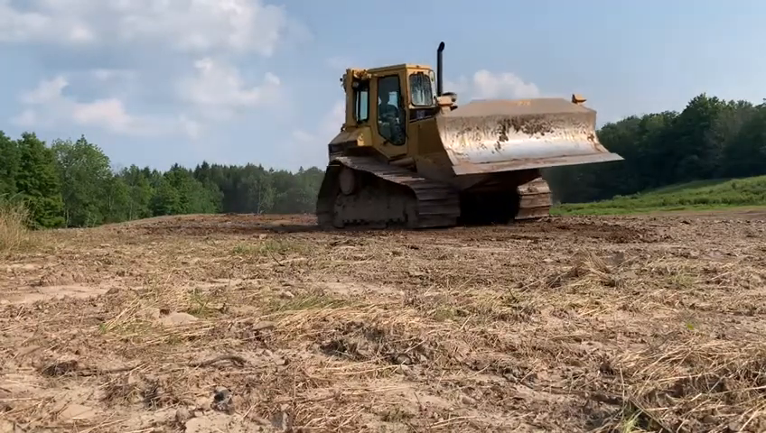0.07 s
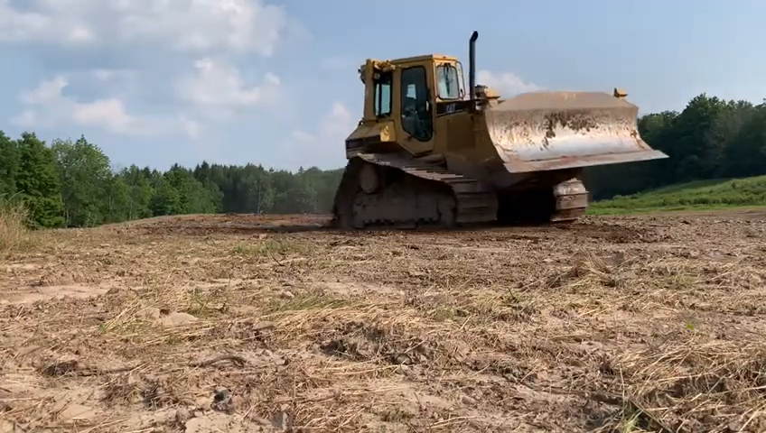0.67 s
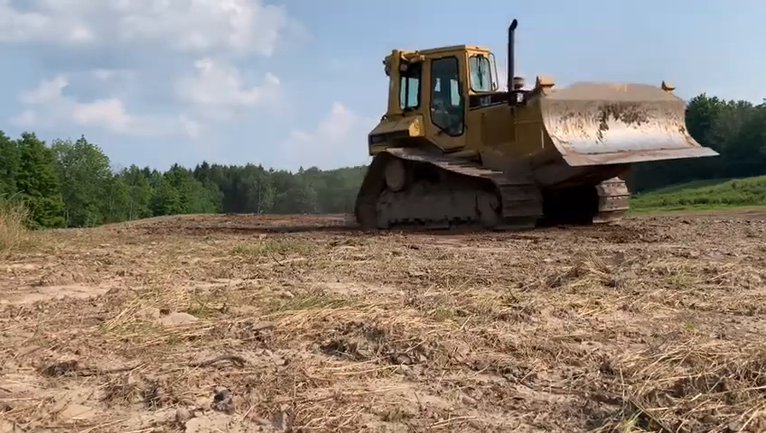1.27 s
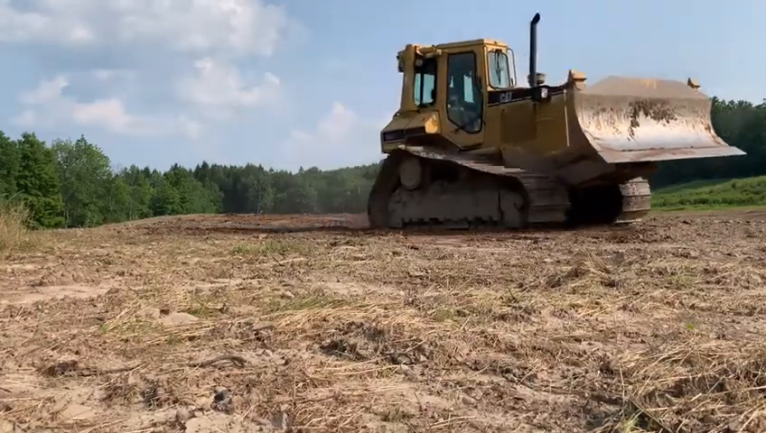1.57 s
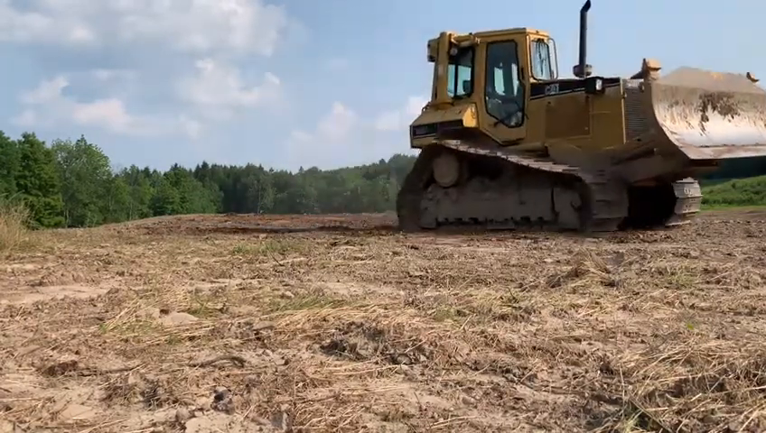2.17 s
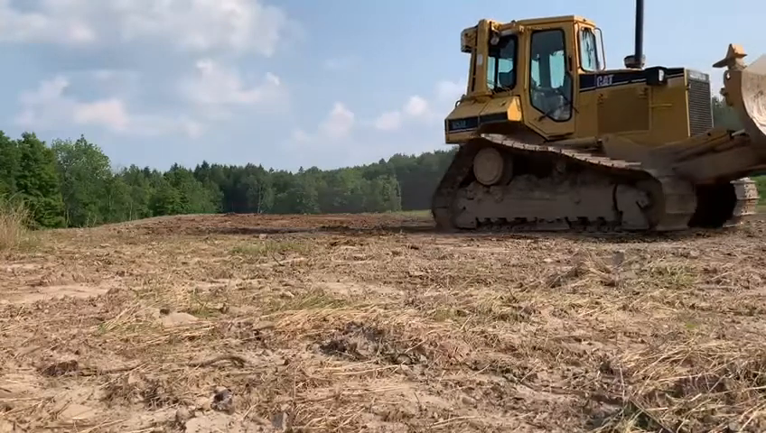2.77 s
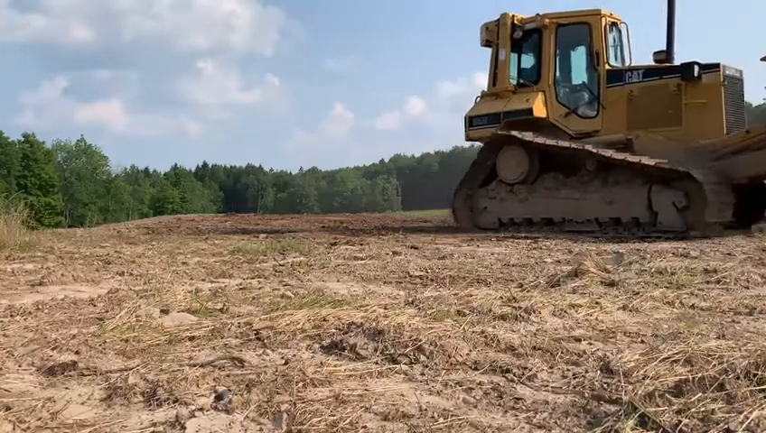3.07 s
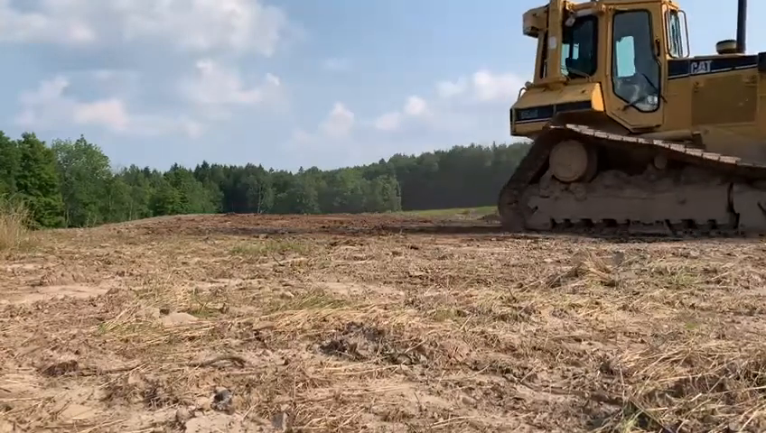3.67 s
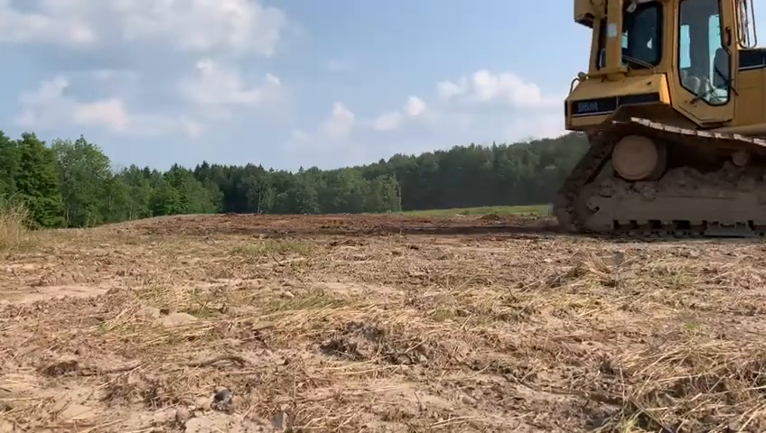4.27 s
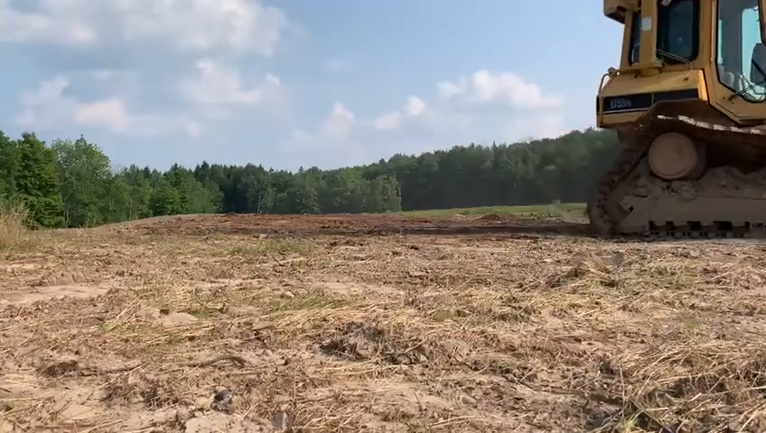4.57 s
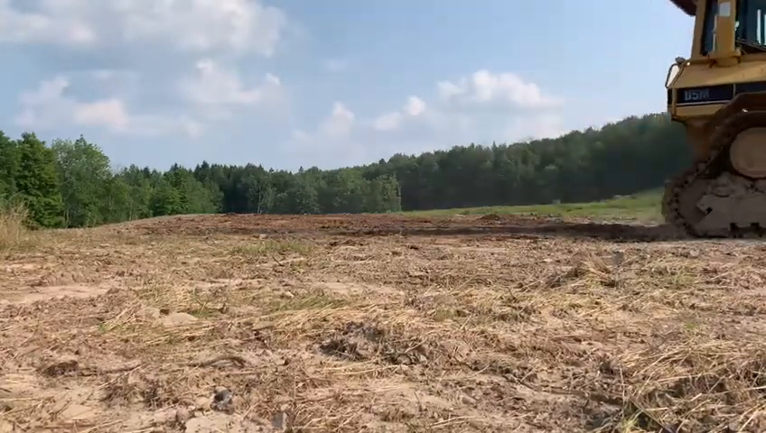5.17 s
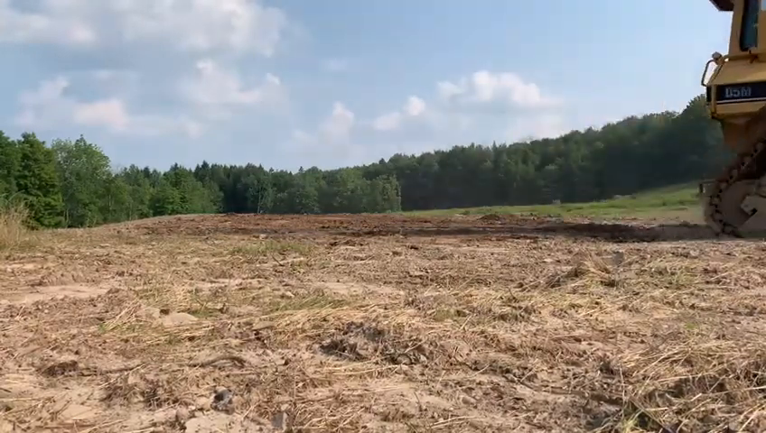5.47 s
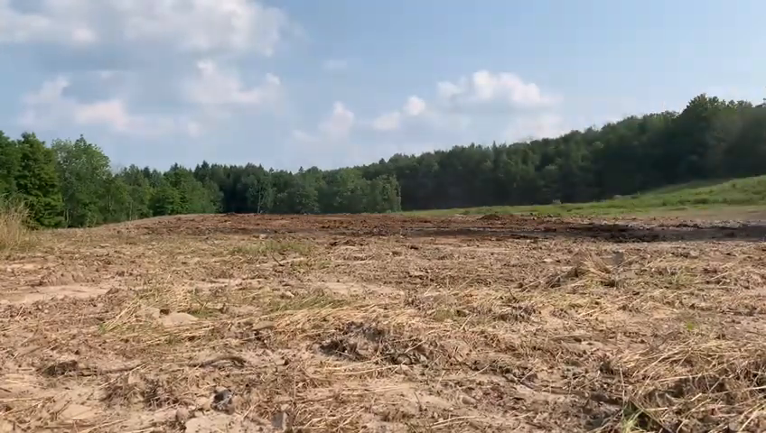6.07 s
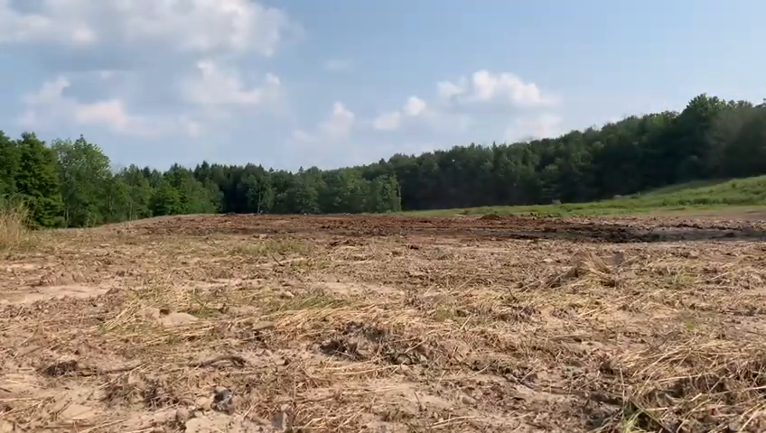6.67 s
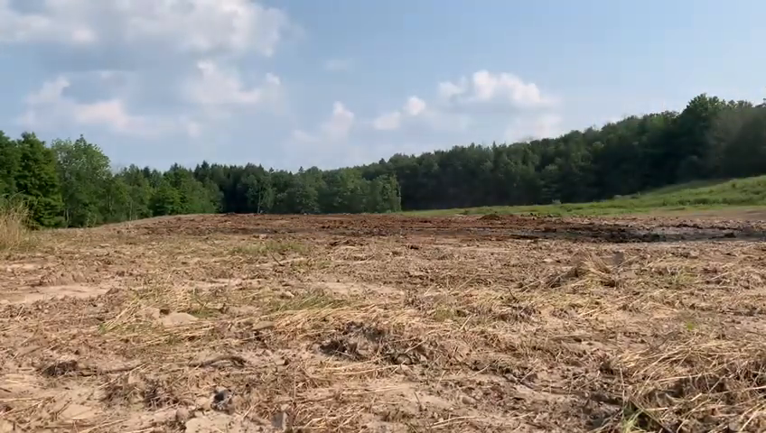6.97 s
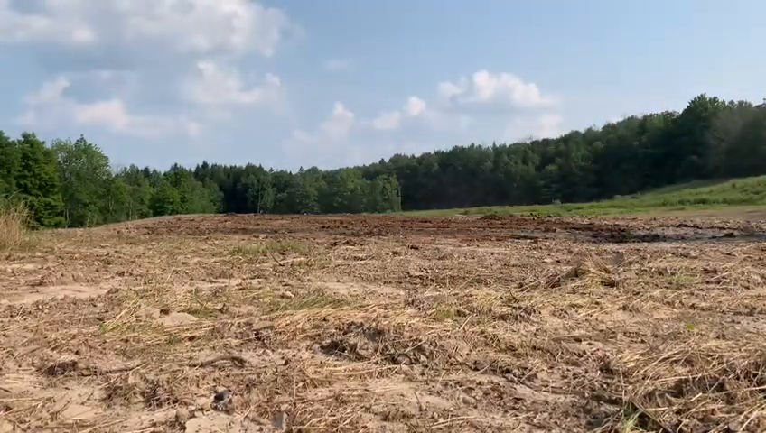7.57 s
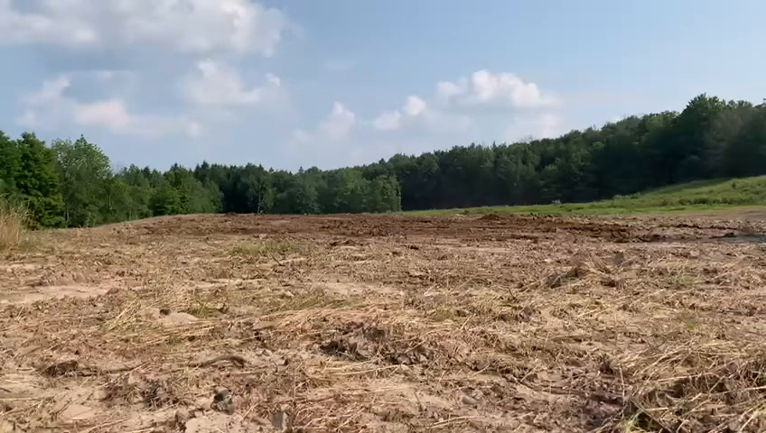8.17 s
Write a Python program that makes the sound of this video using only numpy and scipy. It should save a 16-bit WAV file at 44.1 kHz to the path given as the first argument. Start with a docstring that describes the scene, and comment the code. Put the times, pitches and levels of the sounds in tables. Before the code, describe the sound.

Steel bulldozer tracks clatter, scrape and squeak above a droning diesel engine as the machine passes close by in an open field.

```python
"""A diesel bulldozer crawls past on steel tracks and away to the right, heard on a phone in a field.
About eight times a second a track shoe (one plate of the track) slaps down and makes the frame ring.
Dry pins in the track chain scrape and squeak, rollers rumble over it, and crushed soil hisses.
Underneath, the engine's exhaust, fan and gears drone steadily. The sound changes as first the front,
then the side, then the back of the machine faces the phone."""
import sys
import numpy as np
from scipy import signal
from scipy.fft import rfft, irfft
from scipy.io import wavfile

SR = 44100
rng = np.random.default_rng(int(sys.argv[2]) if len(sys.argv) > 2 else 0)


def int16_out(signal):
    """Quantize to a 16-bit WAV file."""
    q = np.round(np.clip(np.atleast_2d(signal).T, -1, 1) * 32767)
    wavfile.write(sys.argv[1], SR, q.astype(np.int16))


N = 366912
T = np.arange(N) / SR
FREQS = np.arange(N // 2 + 1) * SR / N

# which side faces the phone: (time [s], bearing [quarter turns: 0 = front, 1 = side, 2 = back])
BEARING = [(0, -0.5), (1.9, -0.3044), (3.2, 0.59), (4.5, 1.1719), (5.7, 1.49), (7.3, 2.04), (8.32, 2)]
# how fast the cylinders fire: (time [s], firing rate [Hz])
ENGINE_SPEED = [(0, 106.4), (.7, 107.8), (2.1, 108.4), (3.5, 108.3), (5.6, 108.5), (6.4, 110.5),
                (7.6, 108.7), (8.32, 109)]
# how far the track has moved: (time [s], shoes laid so far [count])
TRACK_TRAVEL = [(.097, 0), (.728, 5), (2.018, 15), (3.915, 30), (5.905, 46), (6.385, 50), (7.179, 57),
                (7.641, 61), (8.251, 66)]


def undb(db):
    """Turn decibels into a number to multiply by."""
    return 10 ** (np.asarray(db) / 20)


def unit(x):
    """Scale a sound so that its average level (rms) is 1."""
    return x / np.sqrt(np.mean(x ** 2) + 1e-18)


def curves(table, at=T):
    """Read a table between its rows along straight lines: one curve for each column after the first."""
    positions, *columns = np.transpose(table)
    return [np.interp(at, positions, column) for column in columns]


def facing(values, at=T):
    """Blend three values (front, side, back) by which side of the dozer faces the phone."""
    return np.interp(curves(BEARING, at)[0], np.arange(3), values)


def turned_away():
    """How far the dozer has gone by: 0 until it is side-on, about 1 when seen from behind."""
    return np.maximum(curves(BEARING)[0] - 1, 0)


def colour(x, spectrum):
    """Shape a sound's lows and highs by (frequency [Hz], level [dB]) points; its level comes out as 1."""
    hz, db = np.transpose(spectrum)
    gain = undb(np.interp(np.log(FREQS + 1), np.log(hz), db))
    return unit(irfft(rfft(x) * gain, N))


def treble(x, above_hz, db):
    """Turn the high part of a sound up or down."""
    dull = signal.sosfiltfilt(signal.butter(2, above_hz, fs=SR, output="sos"), x)
    return dull + (x - dull) * undb(db)


def wander(rate):
    """A random curve, roughly within -1 to 1, that heads for a new value `rate` times a second."""
    points = rng.standard_normal(int(N / SR * 200) + 2)
    return 1.232 * np.interp(T * min(rate, 200), np.arange(len(points)), points)


def tone(hz, wobble_db, wobble_rate):
    """A pure tone whose loudness wavers."""
    cycles = np.cumsum(hz) / SR + rng.random()
    return np.sqrt(2) * np.sin(2 * np.pi * cycles) * undb(wobble_db * wander(wobble_rate))


def grit(rate, spread_db):
    """Tiny random impacts of unequal size, about `rate` of them a second."""
    hits = (rng.random(N) < rate / SR) * np.sign(rng.standard_normal(N))
    return unit(hits * undb(spread_db * np.minimum(rng.exponential(size=N), 4)))


def contacts(times, levels_db, lengths_s, rises_s, share):
    """Each contact is one hard blow, holding `share` of the energy, inside a brief rattle."""
    out = np.zeros(N)
    rattle = grit(4000, spread_db=1.89)
    signs = rng.choice([-1, 1], len(times))
    for s, db, length, rise, blow, sign in np.broadcast(times, levels_db, lengths_s, rises_s, share, signs):
        span = slice(max(int((s - .05) * SR), 0), int((s + .2) * SR))
        age = T[span] - s
        swell = np.exp(-.5 * np.where(age < 0, (age / rise) ** 2, abs(age / length) ** 1.097))
        force = rattle[span] * swell
        force *= np.sqrt((1 - blow) / np.sum(force ** 2))
        force[np.argmin(abs(age))] += sign * np.sqrt(blow)
        out[span] += force * undb(db) * np.sqrt((length + rise) * SR)
    return out


def resonate(force, modes, patchy_db):
    """Steel shakes at its own pitches (modes), each by an amount that varies with side and chain link."""
    out, power = 0, 0
    for k, (hz, width, *db) in enumerate(modes):
        gain = facing(undb(db)) * undb(patchy_db * wander(8))
        band = signal.lfilter(*signal.iirpeak(hz, hz / width, fs=SR), force)
        # a second, wider filter cuts more of what lies far from the pitch
        band = signal.lfilter(*signal.iirpeak(hz, hz / (4 * width), fs=SR), band)
        out = out + (-1) ** k * gain * band * np.sqrt(SR / (np.pi * width))
        power = power + gain ** 2
    return out / np.sqrt(power)


def ringing(times, levels_db, pitches_hz, ring_s):
    """Struck steel gives one clear note at each blow, which dies away by 60 dB in `ring_s` seconds."""
    rise_s = .0022
    out = np.zeros(N + SR)
    age = np.arange(SR // 4) / SR
    fade = -np.expm1(-age / rise_s) * np.exp(-np.log(1000) * age / ring_s)
    for s, db, hz, phase in zip(times, levels_db, pitches_hz, rng.random(len(times))):
        start = max(int(s * SR), 0)
        note = np.sqrt(2) * np.sin(2 * np.pi * (hz * age + phase))
        out[start:start + len(age)] += undb(db) * fade * note
    return out[:N]


def roller_squeal():
    """A dry roller sings faintly for a moment as the dozer comes closer."""
    peak_s, length_s, hz = 0.67, 0.02, 2338.5
    swell = undb(-43) * np.exp(-((T - peak_s) / length_s) ** 2)
    return swell * tone(hz * (1 + .002 * wander(40)), wobble_db=2.9, wobble_rate=20)


def whistle():
    """A thin, high whistle comes and goes, and sinks a little in pitch at its end."""
    # the whistle's path: (time [s], pitch [Hz], level [dB])
    whistle_path = [(.4, 9453, -63), (.75, 9453, -37), (1.1, 9453, -59), (2.4, 9450, -60), (2.9, 9450, -44),
                    (3.98, 9440, -56), (4.03, 9442, -43.5), (4.3, 9457, -37.5), (4.65, 9430, -44),
                    (5.1, 9410, -60)]
    hz, db = curves(whistle_path)
    return undb(db) * tone(hz * (1 + .0008 * wander(60)), wobble_db=2, wobble_rate=25)


def soil():
    """Earth crushed in the tracks hisses in quick, uneven spurts."""
    # strength of the hiss: (time [s], level [dB])
    hiss_levels = [(0, -28), (.7, -26.5), (1.5, -25), (2.1, -27), (3.1, -31), (4.2, -34.5), (6.0, -30.5),
                   (7, -33.5), (8.32, -37.5)]
    # tone colour of the hiss: (frequency [Hz], level [dB])
    hiss_spectrum = [(1500, 1.5), (2800, -6), (3400, 1), (4000, 1), (5000, 3), (5900, -0.5), (6500, 3.5),
                     (7300, -12), (8100, 2.5), (8800, 1), (10300, -2.5), (11500, -17)]
    hiss = colour(grit(9000, spread_db=2.31), hiss_spectrum)
    hiss = treble(hiss, above_hz=7000, db=facing((-0.03, 0.96, -1.5)))  # the body hides it from behind
    return hiss * undb(curves(hiss_levels)[0] - 2.0 + 1.27 * wander(70) + 1.37 * wander(9))


def gears():
    """The gears whine faintly, and more faintly still from behind."""
    # gear notes: (pitch [Hz], level [dB])
    gear_notes = [(1410, -45), (2493, -49)]
    whine = sum(undb(db) * tone(hz * (1 + 0.00349 * wander(40)), wobble_db=5.02, wobble_rate=9)
                for hz, db in gear_notes)
    return whine * undb(-7 * turned_away())


def fan(firing_hz):
    """The cooling fan's blades hum in step with the engine, loudest as the radiator goes by."""
    # strength of the hum: (time [s], level [dB])
    fan_levels = [(0, -23.5), (1.4, -20.5), (3.2, -16), (5.5, -18), (7.6, -20), (8.32, -24)]
    blade_hz = 1.471 * firing_hz
    hum = tone(blade_hz, wobble_db=0.48, wobble_rate=12)
    octave = undb(-20) * tone(2 * blade_hz, wobble_db=3.2, wobble_rate=5.5)
    return undb(curves(fan_levels)[0] - 0.2459) * (hum + octave)


def exhaust(firing_hz):
    """The cylinders fire so fast that their puffs blend into a low note with weaker notes around it."""
    # strength of the exhaust: (time [s], firing note [dB], its octave [dB])
    exhaust_levels = [(0, -26.5, -20), (.8, -20, -23), (2.7, -22.5, -22), (3.5, -21.5, -25.5),
                      (5.5, -21, -27), (6.6, -27, -46), (7.7, -25.5, -36), (8.32, -26.5, -39.5)]
    # weaker engine notes: (pitch [times the firing rate], level [dB])
    weak_notes = [(.5, -44.5), (1.667, -31), (2.333, -37.5), (2.5, -36.5), (3, -37)]
    note_db, octave_db = curves(exhaust_levels)
    note = undb(note_db + 0.56) * tone(firing_hz, wobble_db=1.0, wobble_rate=13)
    octave = undb(octave_db) * tone(2 * firing_hz, wobble_db=1.83, wobble_rate=13)
    weak = sum(undb(db) * tone(k * firing_hz, wobble_db=3.0, wobble_rate=5) for k, db in weak_notes)
    return note + octave + weak


def gas_roar():
    """Rushing engine gas makes a low roar that throbs with each firing."""
    # tone colour of the roar: (frequency [Hz], level [dB])
    roar_spectrum = [(15, -35), (35, -41.5), (60, -6), (85, -10.5), (115, -1.5), (150, -3), (200, -0.5),
                     (260, -2.5), (330, -5), (450, -10.5), (700, -21), (1500, -44.5)]
    firing_phase = 2 * np.pi * np.cumsum(curves(ENGINE_SPEED)[0]) / SR
    throb = 1 + 0.182 * np.cos(firing_phase)
    return colour(rng.standard_normal(N) * throb, roar_spectrum) * undb(facing((-18.5, -19, -19.5)))


def hood_boom():
    """The engine hood booms toward the front and the side."""
    # tone colour of the boom: (frequency [Hz], level [dB])
    boom_spectrum = [(150, -46), (230, 4), (300, 1), (400, -14.5), (600, -33.5)]
    return colour(rng.standard_normal(N), boom_spectrum) * undb(facing((-27.5, -23.5, -38.5)))


def rollers():
    """Rollers rumble over the track chain, most of all as they cross a joint between two links."""
    # tone colour of the rumble: (frequency [Hz], level [dB])
    rumble_spectrum = [(200, -10.5), (450, -0.5), (650, -2), (900, -4), (1400, -7.5), (2000, -9.5),
                       (2700, -12.5), (3600, -22.5), (6000, -52)]
    joint_db = facing((.6, .7, 1.5)) * np.cos(2 * np.pi * curves(TRACK_TRAVEL)[0])
    bumps = grit(5000, spread_db=2.24) * undb(2.0 * wander(35) + joint_db)
    rumble = colour(bumps, rumble_spectrum)
    rumble = treble(rumble, above_hz=950, db=-3.5 * turned_away())  # the body hides it from behind
    return rumble * undb(facing((-27, -22, -23)))


def landing_times():
    """The moments at which the track lays down one more shoe."""
    s, laid = np.transpose(TRACK_TRAVEL)
    return np.interp(np.arange(laid[-1] + 1), laid, s)


def pin_turns():
    """List the scrapes: every pin turns a little as its shoe lands, and the driest are much louder."""
    # ordinary scrapes: (time [s], rasp [dB], fizz [dB])
    usual_scrapes = [(0, -34.5, -45.5), (1.7, -31, -42), (2.4, -35, -43.5), (4.3, -26.5, -30.5),
                     (5.6, -39, -47.5), (6.7, -33.5, -49), (8.32, -37, -49.5)]
    # the driest pins, on landing or on the drive wheel: (time [s], rasp [dB], fizz [dB], length [s])
    loud_scrapes = [(0.097, -31.5, -31.5, 0.0089), (0.34, -23.5, -29, 0.012), (0.458, -24.5, -29, 0.03),
                    (0.574, -25.5, -30, 0.009), (0.614, -26.5, -28.5, 0.014), (0.725, -23.5, -26, 0.015),
                    (0.806, -30.5, -46.5, 0.005), (0.863, -29, -30.5, 0.022), (1.115, -28.5, -39, 0.011),
                    (1.374, -30, -39.5, 0.0049), (1.433, -26.5, -35.5, 0.019), (1.51, -26, -30, 0.01507),
                    (1.616, -27, -30.5, 0.016), (1.772, -23.5, -32, 0.013), (1.952, -25, -28.5, 0.0029),
                    (1.998, -22.5, -30.5, 0.021), (2.122, -24.5, -31, 0.013), (2.646, -28.5, -39, 0.01),
                    (2.765, -24.5, -37.5, 0.0072), (2.858, -25, -31, 0.01), (2.986, -25.5, -33, 0.016),
                    (3.139, -22, -29, 0.012), (3.275, -25, -26, 0.022), (3.389, -26, -32.5, 0.011),
                    (3.593, -25, -27, 0.009), (3.662, -25, -34.5, 0.015), (3.716, -37, -29.5, 0.017),
                    (3.776, -30, -31, 0.022), (3.868, -22.5, -25.5, 0.0097), (3.895, -22.5, -25, 0.012),
                    (4.031, -25.5, -33, 0.017), (4.094, -25.5, -25.5, 0.0074), (4.141, -31.5, -30, 0.024),
                    (4.213, -23.5, -28, 0.015), (4.396, -32, -29, 0.014), (4.528, -26, -27.5, 0.02),
                    (4.588, -27.5, -33, 0.016), (4.628, -36, -28, 0.0074), (4.676, -27.5, -34, 0.037),
                    (4.738, -30, -30.5, 0.009), (4.889, -29, -26.5, 0.019), (4.973, -37.5, -38.5, 0.0074),
                    (5.088, -23.5, -23.5, 0.01), (5.133, -21, -26, 0.011), (5.221, -23, -28.5, 0.0099),
                    (5.266, -24.5, -28, 0.02), (5.327, -24, -26, 0.011), (5.407, -34.5, -47, 0.0079),
                    (5.484, -28, -28.5, 0.016), (5.523, -24.5, -27, 0.021), (5.594, -28, -34, 0.017),
                    (5.647, -27.5, -33, 0.018), (5.764, -26, -32, 0.014), (5.885, -29, -54, 0.011),
                    (6.017, -30, -31.5, 0.012), (6.142, -31.5, -34, 0.013), (6.268, -25.5, -34, 0.014),
                    (6.384, -41, -42, 0.008), (6.462, -35, -44, 0.008), (6.853, -43, -35, 0.0137),
                    (6.964, -35.5, -32, 0.012), (7.178, -36, -45.5, 0.009), (7.511, -31.5, -44.5, 0.01),
                    (7.671, -34.5, -43, 0.006), (8.004, -37, -44, 0.012), (8.126, -35, -38.5, 0.01)]
    early_s, jitter_s, length_s, scatter_db = .005, 0.0092, .014, 2
    s = landing_times() - early_s
    lateness, dryness = rng.standard_normal((len(s), 2)).T
    rasp_db, fizz_db = curves(usual_scrapes, s) + scatter_db * dryness
    ordinary = [s + jitter_s * lateness, rasp_db, fizz_db, np.full(len(s), length_s)]
    return np.hstack([np.transpose(loud_scrapes), ordinary])


def pin_squeaks(turns):
    """A pin sticks and slips fast enough to sing for a moment; every scrape also holds two faint squeaks."""
    # the loudest squeaks: (time [s], pitch [Hz], level [dB])
    loud_squeaks = [(.803, 5150, -28), (1.375, 5750, -30.5), (1.382, 3406, -27.5), (1.618, 5540, -29.5),
                    (1.885, 5980, -29.5), (1.952, 5860, -21), (1.948, 3470, -26.5), (2.0, 5700, -29),
                    (2.155, 3430, -28), (3.669, 3556, -29), (3.695, 3500, -33.5), (3.722, 5367, -23),
                    (3.87, 3010, -31.5), (4.744, 5404, -25.5), (4.889, 2972, -25.5), (4.969, 5350, -27.5),
                    (4.978, 11030, -21), (5.406, 3156, -22), (5.51, 3072, -19.5), (5.773, 3104, -26),
                    (5.843, 10560, -28)]
    squeak_s, width_hz = 0.01325, 140
    waver = 1 + 0.00735 * wander(200)
    roughness = undb(2 * wander(200))
    # uneven slipping smears each squeak into a rough chirp
    slip = np.cumsum(rng.standard_normal(N)) * np.sqrt(2 * np.pi * width_hz / SR)
    when, rasp_db, fizz_db, length = turns
    chance = rng.random((len(when), 4)).T
    low = np.transpose([when + length * chance[0], 3000 + 3000 * chance[1], rasp_db - 9])
    high = np.transpose([when + length * chance[2], 8200 + 2800 * chance[3], fizz_db - 9])
    out = np.zeros(N)
    for s, hz, db in [*loud_squeaks, *low, *high]:
        span = slice(max(int((s - .05) * SR), 0), int((s + .05) * SR))
        phase = 2 * np.pi * np.cumsum(hz * waver[span]) / SR + slip[span]
        swell = np.exp(-((T[span] - s) / squeak_s) ** 2)
        out[span] += np.sqrt(2) * undb(db + 2.4) * swell * np.sin(phase)
    return out * roughness


def pin_scrapes(turns):
    """Dry pins break loose in their sleeves: short, gritty rasps with a fizz on top."""
    # how the pins ring: (pitch [Hz], width [Hz], front [dB], side [dB], back [dB])
    pin_modes = [(2972, 183, -16, 0, -6), (3410, 228, -6, 5.5, -6), (4237, 810, -3, 1.5, -4.5),
                 (4856, 590, 0, 6.5, 3.5), (5743, 436, -1.5, -2.5, -2)]
    # tone colour of the fizz: (frequency [Hz], level [dB])
    fizz_spectrum = [(4500, -44.5), (6500, 5.5), (8500, 3.5), (10500, 9.5), (11500, 3.5)]
    rise_s = 0.0036
    s, rasp_db, fizz_db, length_s = turns
    rasp = resonate(contacts(s, rasp_db, length_s, rise_s, share=0.024), pin_modes, patchy_db=3.0)
    rubbing = contacts(s, fizz_db, length_s, rise_s, share=0)
    fizz = np.std(rubbing) * colour(rubbing, fizz_spectrum)
    return undb(-2) * rasp + undb(2) * fizz


def shoe_landings():
    """List every landing, hard or ordinary; no two shoes are tuned quite alike."""
    # ordinary landings: (time [s], thud [dB], clang [dB], crack [dB], frame ring [dB], shoe ring [dB])
    usual_levels = [(0, -22.5, -26, -47.5, -24.5, -32.5), (2.0, -24, -25, -32, -23, -24.5),
                    (3.5, -18.5, -23.5, -29, -22, -32), (5.5, -22, -29.5, -27.5, -17, -24.5)]
    # hard landings: (time [s], thud [dB], clang [dB], crack [dB], frame ring [dB], shoe ring [dB],
    # frame pitch [Hz], shoe pitch [Hz])
    hard_landings = [(.214, -19, -23, -40, -38.5, -24.5, 634, 1092),
                     (.342, -19.5, -22.5, -35.5, -23, -15, 645.6, 1062),
                     (.47, -16.5, -23, -25.5, -28.5, -21, 634, 1091),
                     (.602, -22, -22.5, -25, -19.5, -30, 628.6, 1123),
                     (.716, -20.5, -18.5, -31.5, -30.5, -18, 603, 1043),
                     (.98, -15.5, -21.5, -39, -19.5, -23.5, 625, 1080),
                     (1.113, -16.5, -20, -33, -24.5, -17, 603, 1061),
                     (1.246, -23, -19.5, -37, -28, -29, 590, 1076),
                     (1.371, -20, -22, -33, -28, -15.5, 689, 1033),
                     (1.387, -26, -31, -34.5, -26.5, -25, 633, 1070),
                     (1.628, -24.5, -18.5, -28.5, -27.5, -24, 661, 1126),
                     (1.758, -17, -24.5, -28.5, -26, -23, 634, 1057),
                     (1.888, -18, -24, -28, -30.5, -24, 633.3, 1038),
                     (2.141, -24, -21.5, -33.5, -21.5, -28, 644, 1052),
                     (2.265, -20, -19, -27, -20, -19.5, 610, 1068),
                     (2.411, -31.5, -23, -25.5, -19.5, -24.5, 634, 1087),
                     (2.512, -20.5, -20.5, -27, -19.5, -19, 638, 1120),
                     (2.644, -20.5, -22.5, -27, -19, -29.5, 651, 1097),
                     (3.148, -20.5, -19.5, -22.5, -18, -36.5, 634, 1066),
                     (3.279, -18, -23, -30, -22, -27, 633, 1064),
                     (3.543, -28, -26, -29.5, -17.5, -34.5, 633, 1063),
                     (4.036, -24.5, -27, -28.5, -19, -26, 637, 1066),
                     (4.41, -28.5, -24, -24, -18.5, -27, 633, 1085),
                     (4.661, -19, -37.5, -28.5, -18, -25, 639.4, 1066),
                     (4.782, -17, -23, -23.5, -20, -23.5, 634, 1070),
                     (5.034, -19.5, -27, -25, -14.5, -28.5, 629.1, 1070),
                     (6.022, -15, -16.5, -15.5, -14.5, -14.5, 646.6, 1042),
                     (6.145, -22.5, -18, -15.5, -14.5, -12, 649.3, 1045),
                     (6.26, -20, -17.5, -18.5, -24.5, -24, 630, 1066),
                     (6.38, -23, -20, -30, -16.5, -17, 639.2, 1045),
                     (6.497, -16.5, -25, -22, -22, -30.5, 635, 1073),
                     (6.585, -23, -27, -29.5, -21, -27, 741, 1012),
                     (6.617, -28, -24, -24.5, -16.5, -24, 618, 1070),
                     (6.723, -21.5, -19, -25.5, -14.5, -16.5, 620, 1047),
                     (6.836, -18.5, -18.5, -21, -20.5, -18, 644, 1028),
                     (6.949, -17, -18, -22.5, -20.5, -17, 591, 1032),
                     (7.067, -17.5, -26, -41, -19.5, -23.5, 606, 1006),
                     (7.179, -15.5, -20.5, -23, -14.5, -12, 734.4, 1052),
                     (7.275, -22, -22.5, -22.5, -24.5, -20, 670, 1190),
                     (7.31, -24.5, -31, -36.5, -23.5, -30, 634, 1064),
                     (7.407, -16, -31, -21, -13.5, -14, 597, 1070),
                     (7.522, -15, -15.5, -24.5, -10.5, -20.5, 617, 1165),
                     (7.641, -17, -33, -23.5, -6.5, -23.5, 619, 1054),
                     (7.762, -16, -19, -34.5, -12.5, -11.5, 659.6, 1045),
                     (7.881, -19.5, -19, -32.5, -12, -19, 639.4, 1013),
                     (8.005, -23.5, -17.5, -21, -9.5, -20.5, 621, 1083),
                     (8.129, -15.5, -20, -27.5, -17.5, -15.5, 626, 1039),
                     (8.248, -21, -17, -22.5, -18, -13, 607.7, 1167)]
    frame_hz, shoe_hz, detune, scatter_db = 634, 1066, .025, 2
    s, hard = landing_times(), np.array(hard_landings)
    levels_db = np.transpose(curves(usual_levels, s)) + scatter_db * rng.uniform(-1.22, 1, (len(s), 5))
    pitches_hz = np.array([frame_hz, shoe_hz]) * (1 + detune * rng.uniform(-1.25, 1, (len(s), 2)))
    ordinary = np.column_stack([s, levels_db, pitches_hz])
    no_hard_nearby = np.min(abs(s[:, None] - hard[:, 0]), axis=1) > .05
    return np.vstack([hard, ordinary[no_hard_nearby]]).T


def track_shoes():
    """Each shoe lands steel on steel with a thud, a clang and a crack; then frame and shoe ring on."""
    # low modes of shoes and frame: (pitch [Hz], width [Hz], front [dB], side [dB], back [dB])
    thud_modes = [(325, 108, 0.5, -6, -1.5), (423.3, 51, -2, 4, 4.5), (489.5, 55.3, -6, 2.5, -3),
                  (573, 83, -13, -13.5, -5.5), (700.8, 116, -6, -10, -1)]
    # their higher modes: (pitch [Hz], width [Hz], front [dB], side [dB], back [dB])
    clang_modes = [(860, 203, 3.5, 7, -6.5), (1065.2, 126, 2.5, 7.5, -2), (1190.2, 67, -1.5, -0.5, -1),
                   (1387.5, 104, -5, 2.5, 0)]
    # tone colour of the crack: (frequency [Hz], level [dB])
    crack_spectrum = [(1100, -13), (1600, 2.5), (2350, 4.5), (2900, -31.5), (6000, -27)]
    s, thud_db, clang_db, crack_db, frame_db, shoe_db, frame_hz, shoe_hz = shoe_landings()
    blow = dict(lengths_s=facing((0.015, 0.016, 0.011), s), rises_s=facing((.0035, .0055, .007), s),
                share=facing((.2, .07, .04), s))
    thud = resonate(contacts(s, thud_db + 1.9, **blow), thud_modes, patchy_db=2.5)
    other_track = contacts(s - 0.013, clang_db + facing((-12, -7, -7), s), **blow)  # lands just before
    this_track = contacts(s, clang_db + 0.24, **blow)
    clang = resonate(this_track + other_track, clang_modes, patchy_db=1.5)
    crack_force = contacts(s, crack_db - 1.49, **blow)
    crack = np.std(crack_force) * colour(crack_force, crack_spectrum)
    ring_start = s - facing((.003, .005, .006), s)
    frame = ringing(ring_start, frame_db + 1.2, frame_hz, ring_s=.11)
    shoe = ringing(ring_start, shoe_db + 2.6, shoe_hz, ring_s=.09)
    overtone_hz = 1420 * (1 + .025 * rng.uniform(-1, 1, len(s)))  # the shoe's fainter, higher note
    overtone = ringing(ring_start, shoe_db - 14.5, overtone_hz, ring_s=0.095)
    return thud + clang + crack + frame + shoe + overtone


def clatter(turns):
    """All the noisy parts of the machine, with fresh random detail on each call."""
    return gas_roar() + rollers() + hood_boom() + track_shoes() + pin_scrapes(turns) + soil()


def microphones(direct, scattered):
    """Left and right differ by the dozer's bearing, scattered sound and the phone's stereo processing."""
    # left against right: (frequency [Hz], left's lead head-on [radians], extra lead [radians per
    # quarter turn], left minus right before scaling by bearing [dB], likeness [0-1])
    microphone_pair = [(0, 0, 0, 0, 1), (80, 0, -0.03, -0.6, .995), (160, 0, -0.28, -1.9, .985),
                       (265, 0, -0.36, -2.5, 0.96), (525, 0, -0.78, -2, 0.92), (830, 0, -1.08, -2.3, 0.92),
                       (1390, 0, -1.42, -2, 0.92), (2170, 0, -1.68, -0.1, .88),
                       (2950, 0.88, -3, -4.5, 0.78), (4760, 1, -2.5, -7.5, 0.1), (5540, 0.1, -1.6, -12, 0),
                       (6250, -2, 0.5, -4.5, 0.73), (7200, -3.5, 0, 1, 1), (8030, -4.5, -0.5, 3, 0.72),
                       (8700, -6.5, 0.5, -1.5, 0.93), (9930, -6.5, 0, 0, 0.8), (10860, -9, -0.5, 0, 1)]
    hz, s, (mid, side) = signal.stft(np.array([direct, scattered]), SR, nperseg=1024)
    head_on, turning, pan_db, likeness = (column[:, None] for column in curves(microphone_pair, hz))
    bearing = np.clip(curves(BEARING, s)[0], 0, 2)
    lead = head_on + turning * bearing
    pan_db = pan_db * (.65 + .3 * bearing)  # the phone shades its left side as the dozer moves right
    sign = np.array([1, -1])[:, None, None]  # left, right
    gain = undb(sign * pan_db / 2) / np.sqrt((undb(pan_db) + undb(-pan_db)) / 2)
    blend = mid * np.sqrt((1 + likeness) / 2) + sign * side * np.sqrt((1 - likeness) / 2)
    stereo = blend * gain * np.exp(.5j * sign * lead)
    return signal.istft(stereo, SR, nperseg=1024)[1][:, :N]


def scene():
    """The dozer in the open field, with no echo."""
    turns = pin_turns()
    firing_hz, = curves(ENGINE_SPEED)
    drone = exhaust(firing_hz) + fan(firing_hz) + gears()
    direct = drone + whistle() + roller_squeal() + pin_squeaks(turns) + clatter(turns)
    return microphones(direct, scattered=clatter(turns))


def record(dry):
    """The phone clips any peak that is too loud and cuts off the highest treble."""
    top_hz = 11100
    return signal.sosfilt(signal.ellip(10, .2, 70, top_hz, fs=SR, output="sos"), np.clip(dry, -1, 1))


dry = scene()
out = record(dry)
int16_out(out)
```